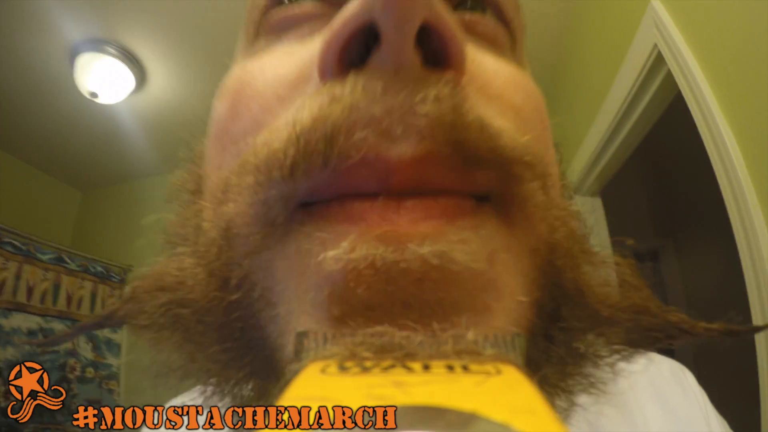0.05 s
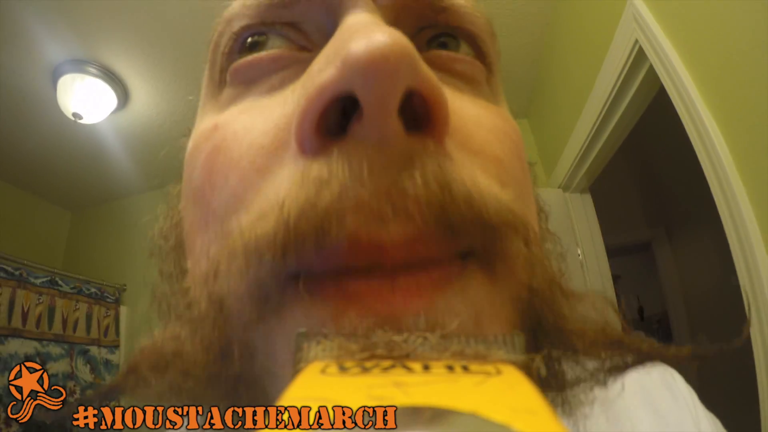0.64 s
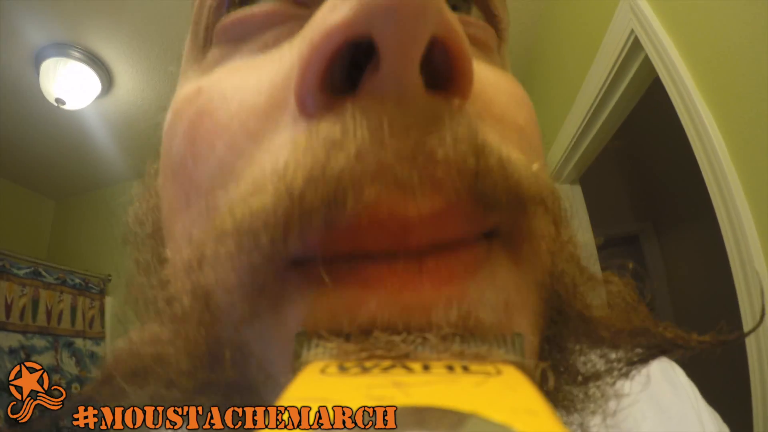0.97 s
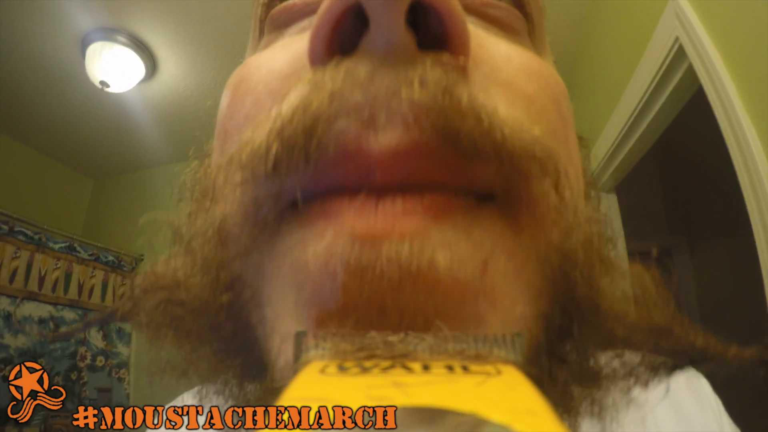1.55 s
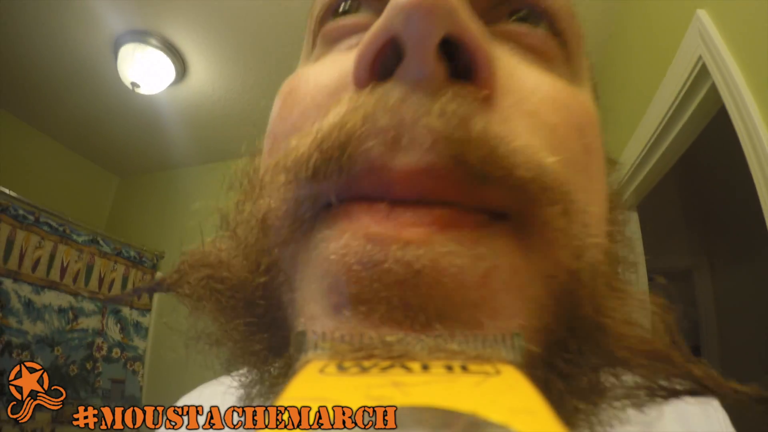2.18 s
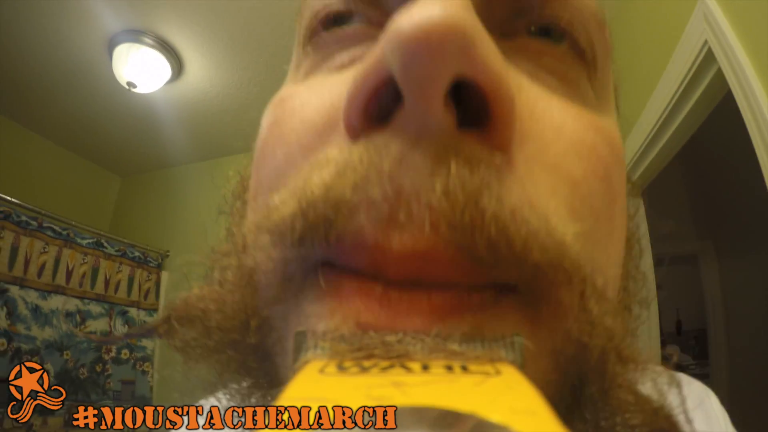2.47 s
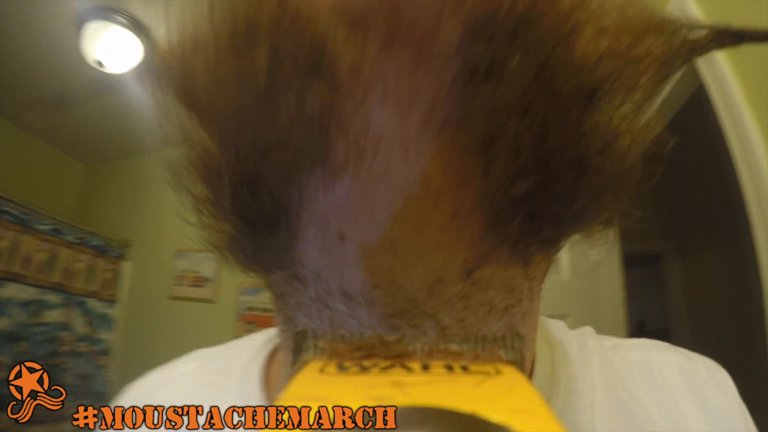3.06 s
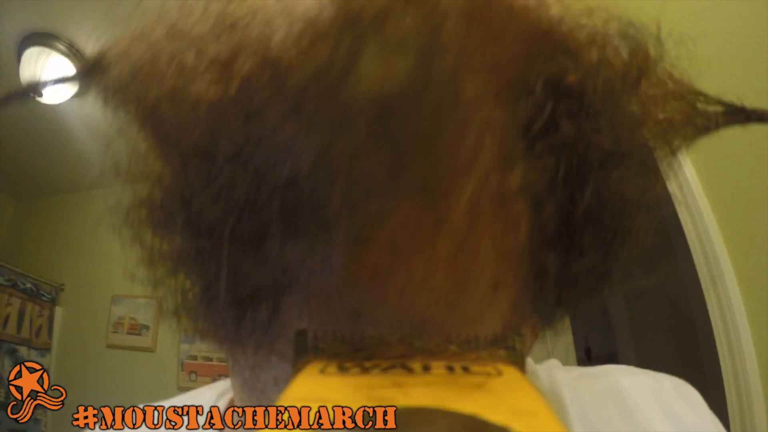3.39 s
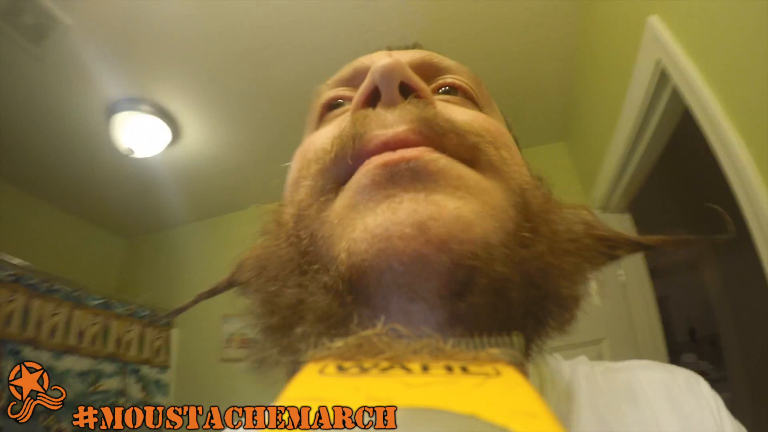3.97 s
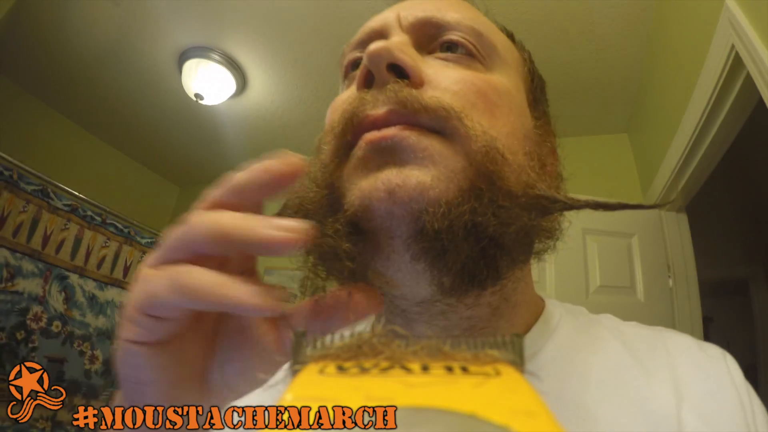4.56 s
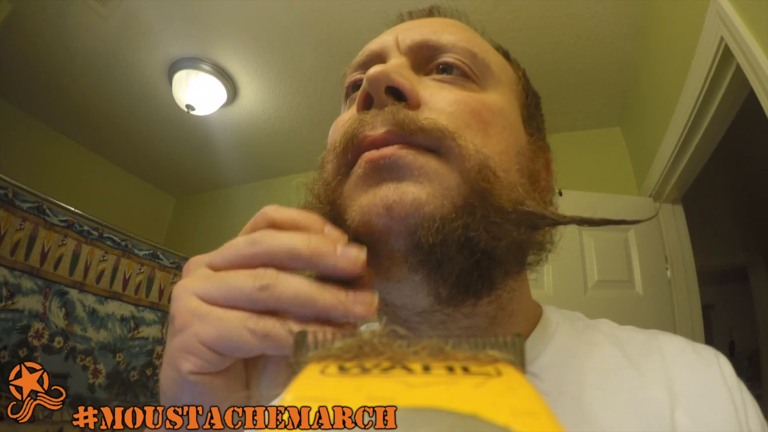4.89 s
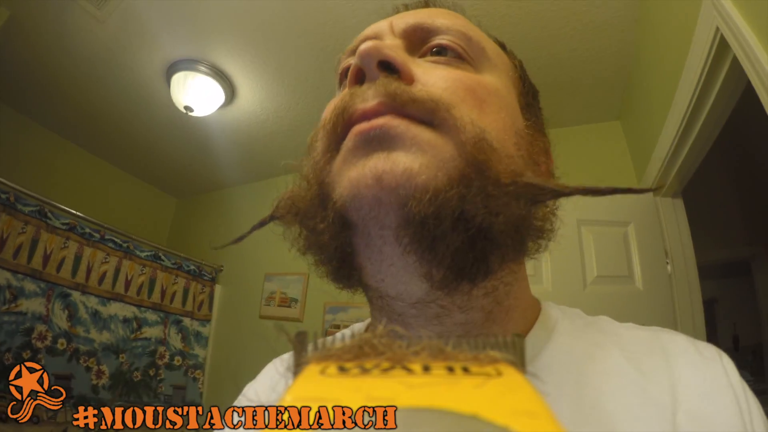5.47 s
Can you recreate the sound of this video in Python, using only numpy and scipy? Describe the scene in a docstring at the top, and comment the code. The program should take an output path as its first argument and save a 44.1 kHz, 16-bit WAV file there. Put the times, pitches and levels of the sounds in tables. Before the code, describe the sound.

A low electric drone and rattling blade buzz come from hair clippers held very close, in a small bathroom with little echo. Thick beard hair crunches in the teeth, the rasp swelling and easing with each push, and now and then a tuft catches with a click. There is a soft rumble from the hand. Finally the beard lifts away, leaving the hum and a lighter buzz.

```python
"""Mains-driven hair clippers, right at the microphone in a small bathroom, cutting a thick beard.
The armature hums at twice the mains rate and the blade buzzes and rubs on every sweep. Hairs caught
between the teeth snap in bursts that ring the plastic shell and the steel, harder as the chin pushes in.
Behind them lie a low handling rumble and a short tail off the walls.
Near the end the beard lifts away and the blade runs free."""
import sys
import numpy as np
from scipy import signal
from scipy.fft import rfft, irfft, next_fast_len
from scipy.io import wavfile
from scipy.ndimage import uniform_filter1d

SR = 44100
rng = np.random.default_rng(int(sys.argv[2]) if len(sys.argv) > 2 else 0)


def wav_out(sig):
    """Save sig, one row per channel (or a flat mono array), as 16-bit PCM at SR to the path in sys.argv[1]."""
    wavfile.write(sys.argv[1], SR, np.round(np.clip(np.atleast_2d(sig).T, -1, 1) * 32767).astype(np.int16))


N = 248283
TIME = np.arange(N) / SR


def from_db(db):
    """Decibels to gain."""
    return 10 ** (np.asarray(db) / 20)


def unit_power(x):
    """Scale to a mean power of 1."""
    return x / np.sqrt(np.mean(x ** 2) + 1e-20)


def even_power(x):
    """Hold the short-term power at 1, keeping the grain."""
    return x / np.sqrt(np.abs(uniform_filter1d(x ** 2, size=2600)) + 1e-12)


def curves(rows):
    """Each column of a timed table, interpolated at every sample."""
    times, *columns = np.transpose(rows)
    return [np.interp(TIME, times, column) for column in columns]


def drift(rate_hz):
    """Slow random wander of spread 1."""
    hop, warm_up = 40, 2000
    pole = np.exp(-2 * np.pi * rate_hz * hop / SR)
    noise = rng.standard_normal(N // hop + warm_up + 2)
    slow = signal.lfilter([1], [1, -2 * pole, pole * pole], noise)[warm_up:]
    return np.interp(np.arange(N) / hop, np.arange(len(slow)), unit_power(slow))


def colour(x, spectrum):
    """Shape a signal by a spectrum of (Hz, dB) points; unit power."""
    hz, db = np.transpose(spectrum)
    size = next_fast_len(N + SR // 2)
    bins_hz = np.maximum(np.fft.rfftfreq(size, 1 / SR), 1)
    gain = from_db(np.interp(np.log(bins_hz), np.log(hz), db))
    return unit_power(irfft(rfft(x, size) * gain, size)[:N])


def cushion(force, cutoff_hz):
    """Soften a blow with a low-pass."""
    return signal.sosfilt(signal.butter(2, cutoff_hz, fs=SR, output="sos"), force)


def ring(force, modes):
    """Resonances in parallel, neighbours in opposite sign."""
    out = 0
    for k, (hz, width_hz, db) in enumerate(modes):
        radius = np.exp(-np.pi * width_hz / SR)
        poles = [1, -2 * radius * np.cos(2 * np.pi * hz / SR), radius ** 2]
        gain = (-1) ** k * from_db(db) * (1 - radius ** 2) / 2
        out += gain * signal.lfilter([1, 0, -1], poles, force + 1e-18)
    return out


def sweeps(angle, lead, sharpness, return_db):
    """Two bursts per cycle, as the teeth cross going out and coming back."""
    coming_back = (1 - np.cos(angle + lead)) / 2
    crossings = np.exp(sharpness * (np.cos(2 * (angle + lead)) - 1))
    return crossings * from_db(return_db * coming_back)


def bathroom(direct, wet_db=-17, t60_s=0.25):
    """The close sound, plus a short diffuse tail that reaches the microphone off the hard walls."""
    t = TIME[:SR // 2]
    tail = rng.standard_normal(len(t)) * from_db(-60 * t / t60_s) * (t > .005)
    tail /= np.sqrt(np.sum(tail ** 2))
    return direct + from_db(wet_db) * signal.fftconvolve(direct, tail)[:N]


# rumble of the clipper in the hand: (frequency [Hz], relative density [dB])
RUMBLE_SPECTRUM = [(10, -15.5), (25, 4), (45, -2.5), (80, -6), (140, -16.5), (200, -10), (300, -18),
                   (600, -29), (1200, -52)]

def handling(level_db=-40, swell_share=.25, jostle_db=1.6):
    """The beard jostles the clipper, which rumbles unevenly, more so as the deep hum swells."""
    swell_db = curves(DRONE_LEVEL)[0] - MEAN_DRONE_DB
    gain = from_db(level_db + swell_share * swell_db + jostle_db * drift(7.6))
    return gain * colour(rng.standard_normal(N), RUMBLE_SPECTRUM)


# steel sliding on steel, heard close: (frequency [Hz], relative density [dB])
RUB_SPECTRUM = [(700, -5.5), (1500, -13.5), (2400, -5), (3300, -3), (4050, 4.5), (4550, -12), (5200, -9.5),
                (6700, -19), (7900, -21), (8700, -6.5), (9700, -16.5), (10600, -32.5), (15000, -42)]

def rubbing(angle, load, level_db=-52, loaded_db=1):
    """The blades hiss against each other twice per cycle, a little more under load."""
    friction = rng.standard_normal(N) * sweeps(angle, lead=-.86, sharpness=1, return_db=-5)
    return from_db(level_db + loaded_db * load) * colour(friction, RUB_SPECTRUM)


# the chin pushes the beard into the blade: (start [s], length [s], pressure [0-1])
CHIN_PUSHES = [(0.85, 0.31, 0.68), (1.35, 0.11, .9), (2.04, .07, 0.3), (2.404, 0.38, 0.7),
               (2.837, 0.32, 1.0), (3.247, .12, 0.4), (3.56, 0.17, 0.57), (3.836, 0.23, 0.44),
               (4.175, 0.26, 0.6), (4.557, 0.094, 0.2)]

def chin_pressure(attack_s=0.059, release_s=0.13):
    """Each push of the chin builds, holds and lets go."""
    pressure = np.zeros(N)
    for start, length, strength in CHIN_PUSHES:
        rise = (TIME - start) / attack_s
        fall = 1 - (TIME - start - length) / release_s
        pressure += strength * np.clip(np.minimum(rise, fall), 0, 1)
    return pressure


def hair_snaps(bursts, per_s, size_db, clump_db):
    """Hairs snap at random while the teeth close, in tufts and in many thicknesses."""
    chance = per_s * unit_power(bursts) * from_db(clump_db * drift(30)) / SR
    sizes = from_db(size_db * np.minimum(rng.exponential(1, N), 4))
    signs = rng.choice([-1, 1], N)
    return (rng.random(N) < chance) * sizes * signs


# the bright edge of a snapping hair: (frequency [Hz], relative density [dB])
SNAP_SPECTRUM = [(1500, -19.5), (3000, 7), (3900, 12.5), (4500, -5), (5100, -6.5), (6200, 1.5),
                 (8000, -8.5), (10000, -9.5), (12500, -17), (14400, -17)]

def crackle(angle, feed_db, level_db=-52.5, knee_db=-5, ragged_db=3):
    """The snaps' sharp edge, straight from teeth to microphone; it levels off once the teeth are full."""
    bursts = sweeps(angle, lead=-.3, sharpness=2.1, return_db=-1)
    snaps = hair_snaps(bursts, per_s=2200, size_db=3, clump_db=1)
    filled = np.tanh(from_db(feed_db - knee_db))
    gain = filled * from_db(level_db + ragged_db * drift(5.7))
    return gain * even_power(colour(snaps, SNAP_SPECTRUM))


# thick tufts reach the teeth: (time [s], shell change [dB], steel change [dB])
THICK_TUFTS = [(0.15, -2, 3), (0.96, 0, 0), (1.92, -2, 4.5), (2.0, 4.5, 4.5), (2.1, 6.5, -0.5),
               (2.555, 6, -1.5), (2.96, 3, 0), (3.04, 2.5, 0.5), (3.285, 0.5, 5.5), (3.93, 7, 3.5),
               (4.1, 3, 5.5), (4.23, 2.5, -0.5), (4.38, 1.5, 2.5), (4.44, 2, 5), (4.68, 0.5, 2.5),
               (4.805, 4, 2.5), (4.98, -0.5, 2.5), (5.025, 1.5, 2.5)]

def tufts(half_passage_s=.022):
    """Each passing tuft briefly shifts the shell's rasp and the steel's ring; two rows in dB."""
    return sum(np.outer([shell_db, steel_db], np.exp(-((TIME - at) / half_passage_s) ** 2))
               for at, shell_db, steel_db in THICK_TUFTS)


# resonances of the plastic shell and the steel blade: (frequency [Hz], width [Hz], relative level [dB])
SHELL_MODES = [(495, 277, -17), (837, 116, -8.5), (975, 80, -2.5), (1132, 138, -5), (1624, 180, -16)]
STEEL_MODES = [(2209, 263, -4), (2293, 168, .5), (2710, 31, -11.5), (2984, 77, -15), (4110, 260, -25.5),
               (4986, 220, -28), (6270, 110, -37.5), (7170, 1000, -39.5), (11200, 1600, -62),
               (13700, 2440, -56.5)]

def snipping(angle, feed_db, load, shell_db=-37.5, steel_db=-38, knock_db=-4.5):
    """Snapping hairs and the loaded blade's soft, slightly irregular knock ring shell and steel."""
    bursts = sweeps(angle, lead=.7, sharpness=1.3, return_db=-1.5)
    snaps = hair_snaps(bursts, per_s=800 + 1100 * load, size_db=2.2, clump_db=3)
    # one knock per stroke, just before the armature reaches the end of its swing
    cycles = (angle + .067 * drift(40)) / (2 * np.pi) + .1117
    strokes = np.diff(np.floor(cycles), prepend=0)
    knocks = cushion(strokes * (1 + .66 * drift(50)), cutoff_hz=3500)
    shell, steel = [even_power(ring(snaps, modes)) + from_db(knock_db) * even_power(ring(knocks, modes))
                    for modes in (SHELL_MODES, STEEL_MODES)]
    shell_tuft_db, steel_tuft_db = tufts()
    shell_gain = from_db(shell_db + 1.14 * feed_db + shell_tuft_db + 2 * drift(18))
    steel_gain = from_db(steel_db + .99 * feed_db + steel_tuft_db + drift(13))
    return shell_gain * shell - steel_gain * steel


# tufts that snag and snap at once: (time [s], peak level [dB])
SNAG_PEAKS = [(1.365, -30), (2.104, -24), (3.281, -19), (4.781, -17), (5.331, -25.5), (5.571, -30)]

def snags():
    """A whole tuft gives way: one cushioned blow on shell and steel."""
    force = np.zeros(N)
    for at, db in SNAG_PEAKS:
        force[round(at * SR)] = from_db(db)
    cushioned = cushion(force + 1e-18, cutoff_hz=3000)
    blows = ring(cushioned, SHELL_MODES) - ring(cushioned, STEEL_MODES)
    return blows * force.max() / np.abs(blows).max()


# the blade at the microphone: (multiple of the stroke rate, free level [dB], change at full load [dB])
BUZZ_PARTIALS = [(4.08, -39.5, 2.5), (7.64, -50, -11.5), (9.29, -51, 12), (10.45, -55, 2.5),
                 (11.2, -51.5, 0), (12.27, -65.5, 1.5), (13.44, -55.5, 5.5), (13.93, -61.5, 1.5),
                 (14.9, -59.5, 2.5), (17, -67.5, -3.5), (17, -60, 9.5), (18.33, -61.5, 16),
                 (20.95, -56.5, 10), (21.22, -62, 2.5), (22.67, -59.5, 6), (22.6, -68.5, -5.5),
                 (25.3, -66, 13), (27.4, -69.5, -0.5), (32.5, -64.5, 3.5), (37.3, -79, 7), (39.7, -76, 6),
                 (44.3, -81, 9)]
# the blade chatters on the comb: (multiple of the stroke rate, change at full pressure [dB])
COMB_CHATTER = [(9, -1.5), (10, 7.5), (11, 8), (13, 13.5), (14, 9.5), (16, 5), (19, 1), (22, 0), (25, 2.5),
                (30, 0)]

def blade_buzz(angle, load, push, waver_db=2, jitter_rad=.014, lag_rad=.05, scatter_rad=.62):
    """The blade's pulse at each stroke, as partials; hair makes it uneven, pressure makes it chatter."""
    multiples, free_db, loaded_db = np.transpose(BUZZ_PARTIALS)
    shaken = angle + jitter_rad * load * drift(21)
    out = 0
    for k in [4, *range(8, 45)]:
        load_db = load * (np.interp(k, multiples, loaded_db) + waver_db * drift(.91))
        chatter_db = push * np.interp(k, *np.transpose(COMB_CHATTER))
        level_db = np.interp(k, multiples, free_db) + load_db + chatter_db
        # higher partials arrive later, which spreads the pulse over a few milliseconds
        phase = k * shaken - lag_rad * k * k + scatter_rad * np.log(k / 4) * rng.standard_normal()
        out += from_db(level_db) * np.cos(phase)
    return np.sqrt(2) * out


# the deep hum swells as the head leans on the clipper and draws away: (time [s], level [dB])
DRONE_LEVEL = [(0.0, -20.5), (0.03, -18), (0.51, -21), (2.09, -19.5), (2.29, -23), (3.24, -24.5),
               (3.37, -21), (3.9, -22), (3.98, -18.5), (4.31, -18), (4.43, -16), (5.6, -13)]
MEAN_DRONE_DB = -16
# steady overtones of the armature, relative levels: (time [s], 2nd multiple [dB], 3rd [dB])
LOW_OVERTONES = [(0.04, -21, -43.5), (0.64, -21, -33.5), (1.7, -20, -33), (2.3, -21, -31.5),
                 (4.67, -19, -30.5), (4.88, -19, -30), (5.56, -21, -30.5)]
# its nasal overtones, relative levels: (time [s], 5th multiple [dB], 6th [dB], 7th [dB])
NASAL_OVERTONES = [(0.0, -35.5, -46, -48), (0.2, -36.5, -42, -57), (0.47, -37.5, -47.5, -42),
                   (1.23, -34.5, -46.5, -45.5), (2.76, -39, -51, -43.5), (2.85, -40, -50, -53),
                   (2.89, -37.5, -45, -42), (3.45, -37, -46.5, -49), (3.62, -37, -60, -44),
                   (3.71, -39.5, -52, -55), (3.79, -36.5, -42.5, -41), (4.01, -36.5, -54, -45),
                   (4.9, -38.5, -52, -51.5), (5.6, -39.5, -49, -40)]

def armature_hum(angle, push, load, slip_rad_per_db=.15, lag_rad=.066, pushed_db=1.3, waver_db=2):
    """The armature's low partials, close and dry; the higher ones lag, and waver under load."""
    drone_db = curves(DRONE_LEVEL)[0] + .5 * drift(13)
    # the sprung armature slips in phase as its swing grows, which leans the wave over
    slip = slip_rad_per_db * (drone_db - MEAN_DRONE_DB)
    drone = from_db(drone_db) * np.cos(angle + slip)
    low_db = [db + .07 for db in curves(LOW_OVERTONES)]
    nasal_db = [db + 2.03 + pushed_db * push + waver_db * load * drift(8.2)
                for db in curves(NASAL_OVERTONES)]
    overtones = sum(from_db(db) * np.cos(k * angle - lag_rad * k * k)
                    for k, db in zip((2, 3, 5, 6, 7), low_db + nasal_db))
    # unequal half waves of the mains add faint lines between the partials
    mains_lines = from_db(-50) * np.cos(angle / 2) + from_db(-64) * np.cos(1.5 * angle)
    return np.sqrt(2) * (drone + overtones + mains_lines)


# how thickly the beard lies in the teeth between pushes, until it lifts away: (time [s], level [dB])
BEARD_FEED = [(0.0, -4), (0.15, -2.5), (1.1, -0.5), (1.3, -3.5), (1.5, -2.5), (1.65, -3), (2.0, -1),
              (2.35, -2.5), (2.55, 1), (3.1, -1.5), (3.5, -1), (3.85, 2), (4.5, 2), (5.08, 0.5),
              (5.22, -6.5), (5.4, -18.5)]

def scene(stroke_hz=119.982, push_feed_db=2.5, full_load_db=3.5):
    """Clippers at one microphone: each push feeds in more hair, raising the snipping and the load."""
    angle = 2 * np.pi * stroke_hz * TIME - .55
    push = chin_pressure()
    feed_db = curves(BEARD_FEED)[0] + push_feed_db * push
    load = np.clip(from_db(feed_db - full_load_db), 0, 1)
    cutting = snipping(angle, feed_db, load) + snags() + crackle(angle, feed_db) + rubbing(angle, load)
    motor = armature_hum(angle, push, load) + blade_buzz(angle, load, push)
    return (motor + bathroom(cutting) + handling())[None]


def record(dry, cutoff_hz=15300):
    """The top of the microphone's signal is cut steeply."""
    return signal.sosfilt(signal.ellip(12, .1, 80, cutoff_hz, fs=SR, output="sos"), dry)


dry = scene()
out = record(dry)
wav_out(out)
```